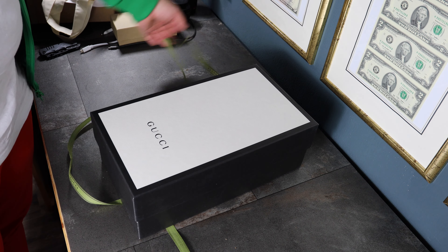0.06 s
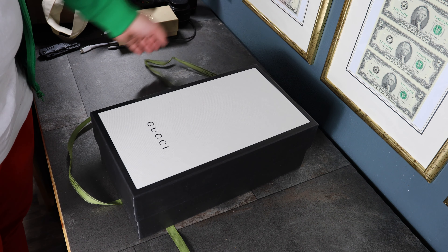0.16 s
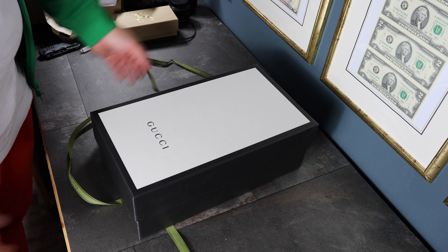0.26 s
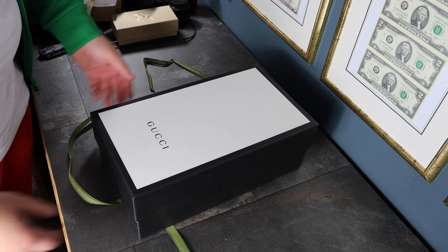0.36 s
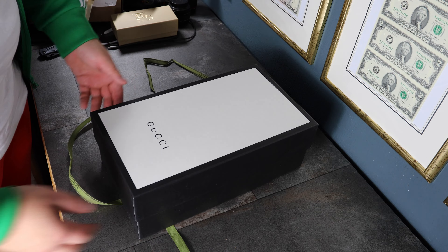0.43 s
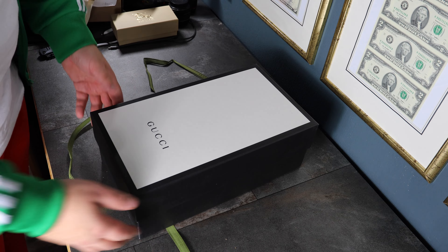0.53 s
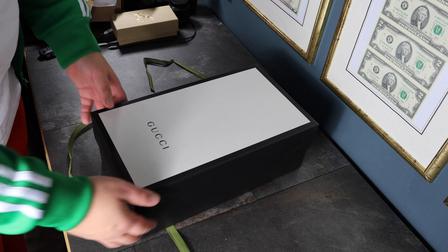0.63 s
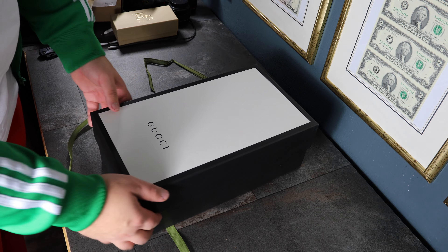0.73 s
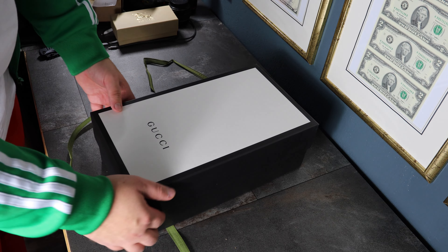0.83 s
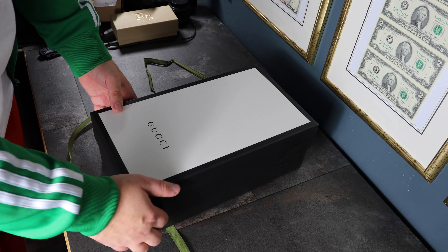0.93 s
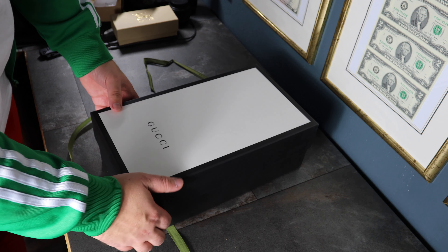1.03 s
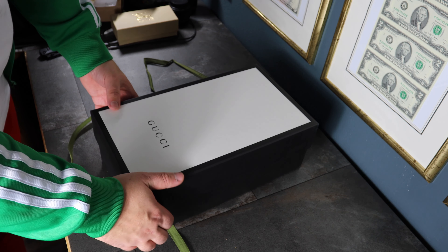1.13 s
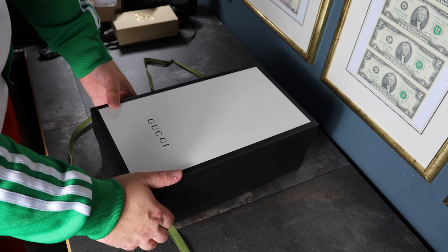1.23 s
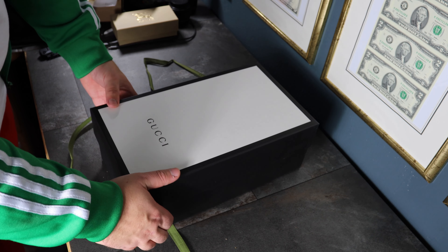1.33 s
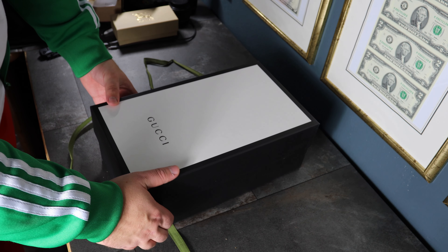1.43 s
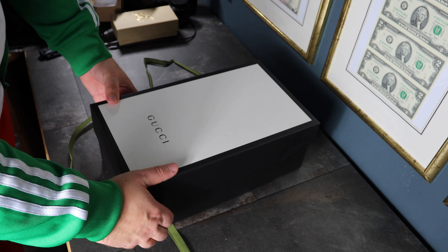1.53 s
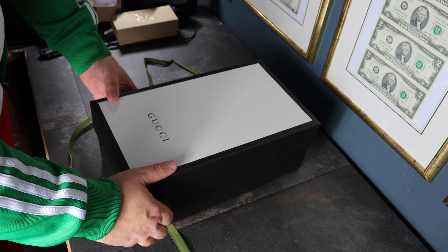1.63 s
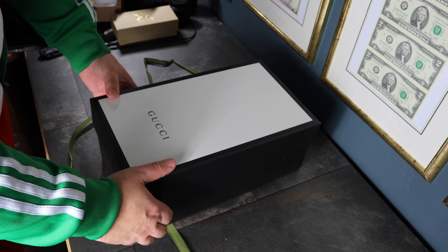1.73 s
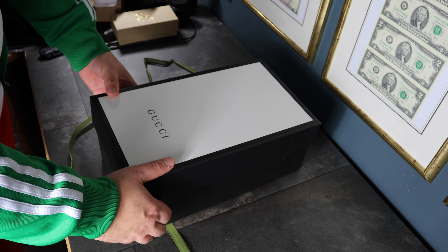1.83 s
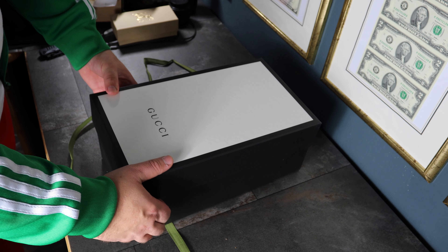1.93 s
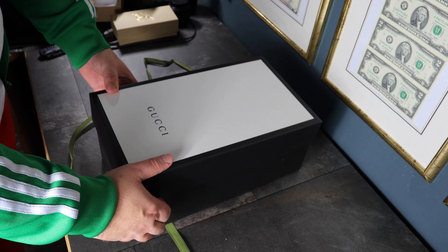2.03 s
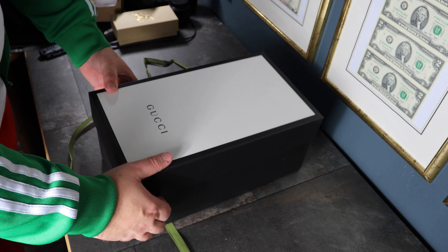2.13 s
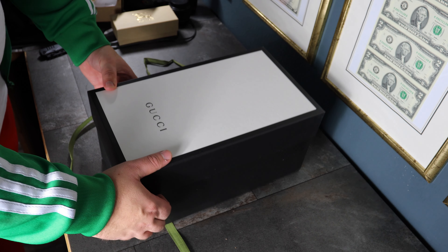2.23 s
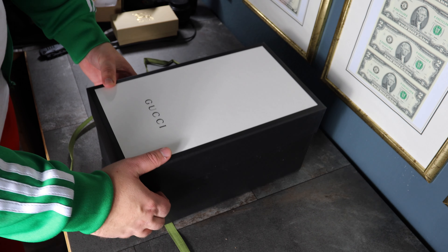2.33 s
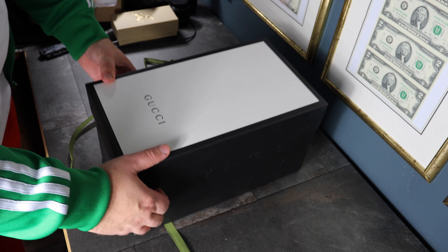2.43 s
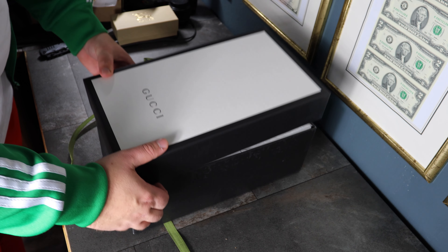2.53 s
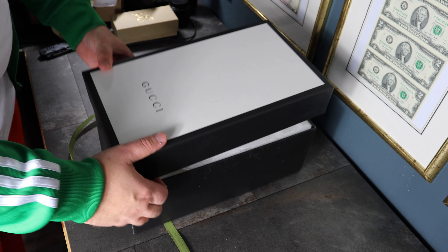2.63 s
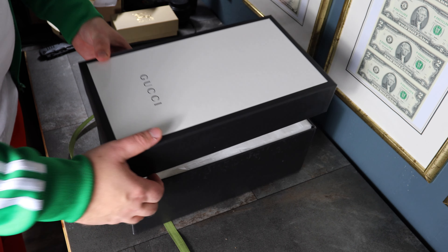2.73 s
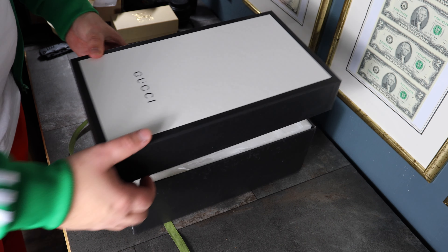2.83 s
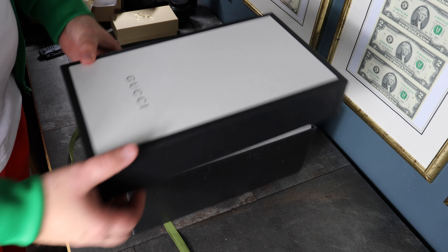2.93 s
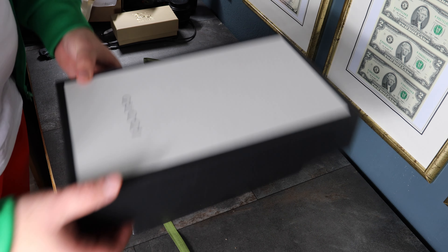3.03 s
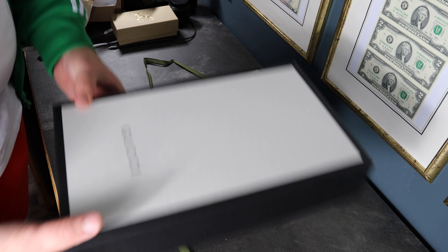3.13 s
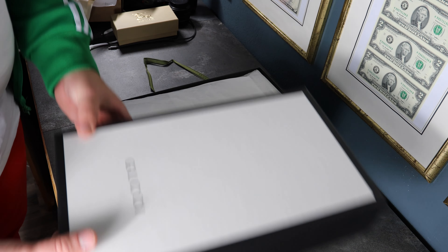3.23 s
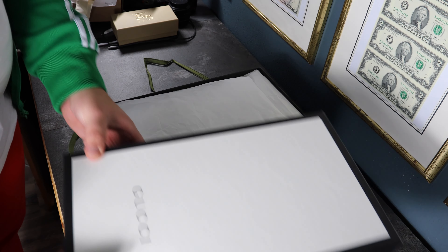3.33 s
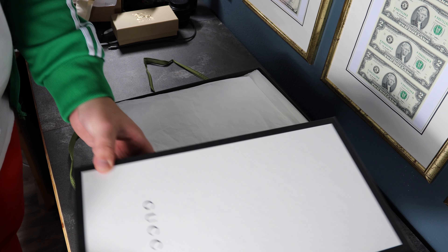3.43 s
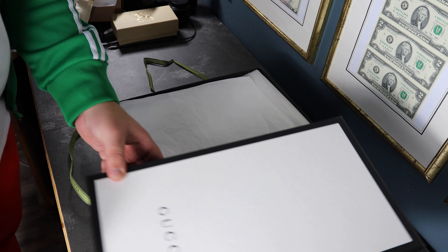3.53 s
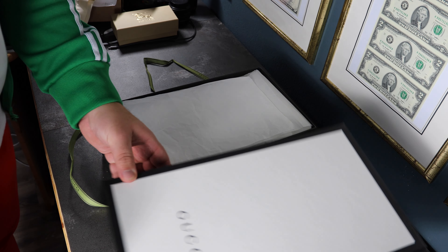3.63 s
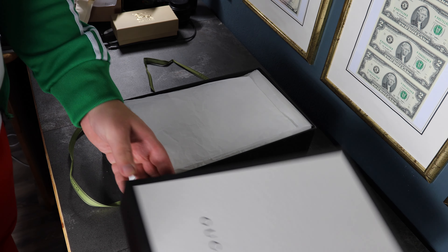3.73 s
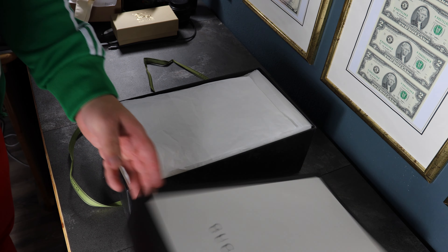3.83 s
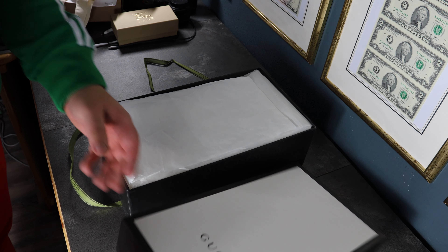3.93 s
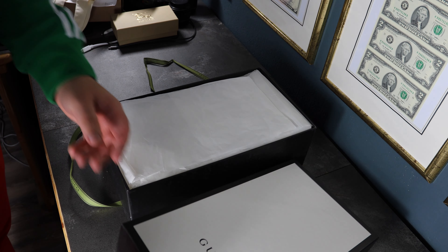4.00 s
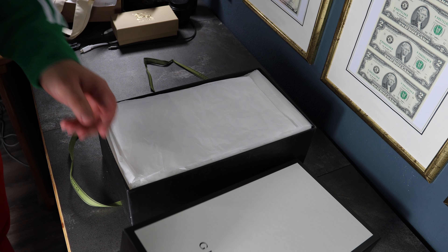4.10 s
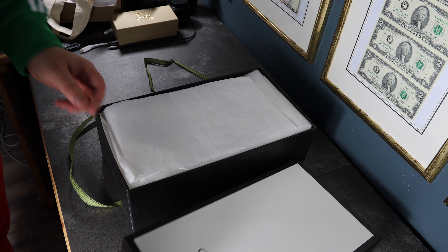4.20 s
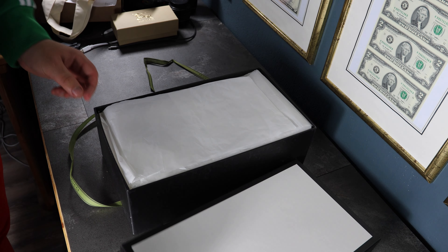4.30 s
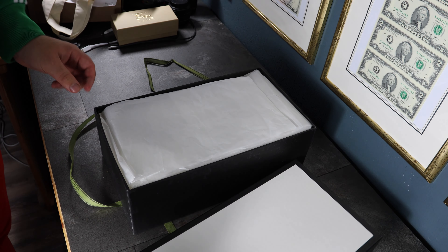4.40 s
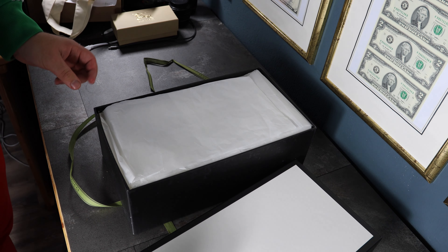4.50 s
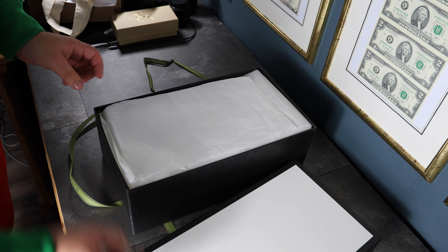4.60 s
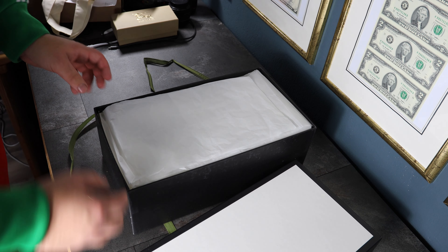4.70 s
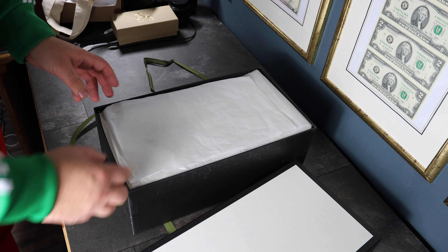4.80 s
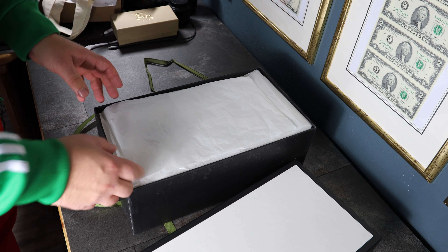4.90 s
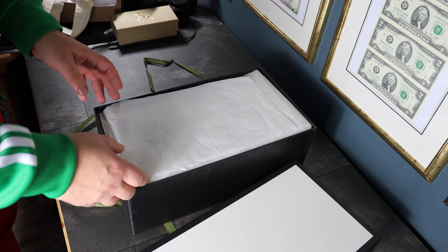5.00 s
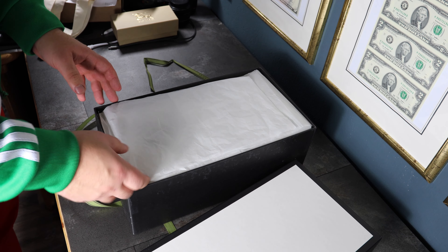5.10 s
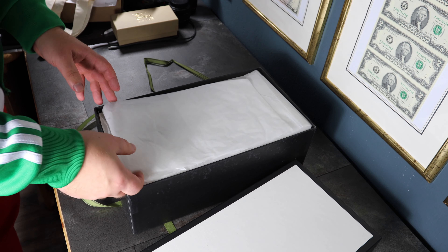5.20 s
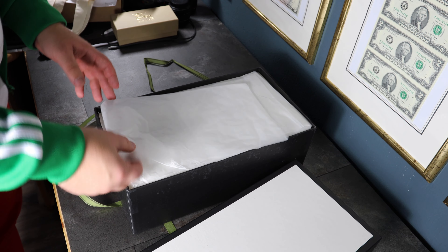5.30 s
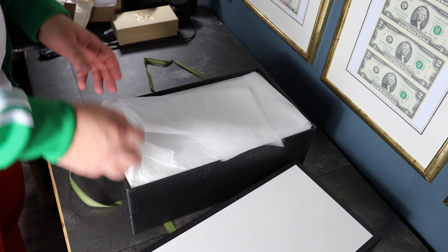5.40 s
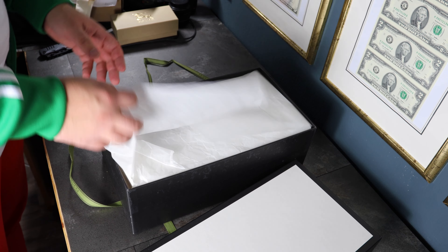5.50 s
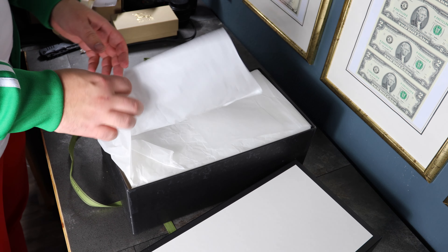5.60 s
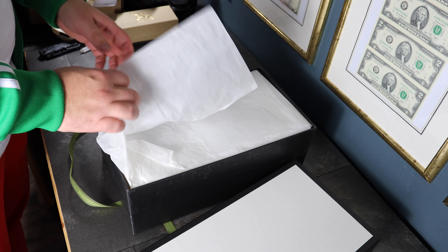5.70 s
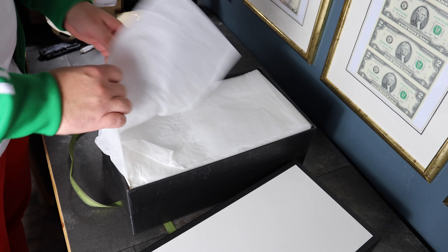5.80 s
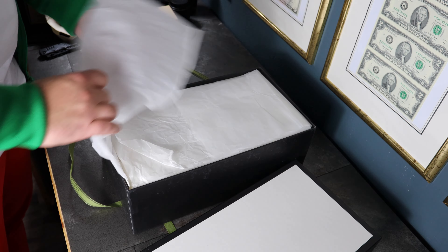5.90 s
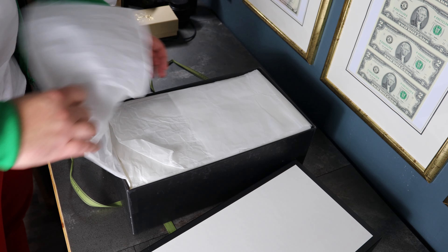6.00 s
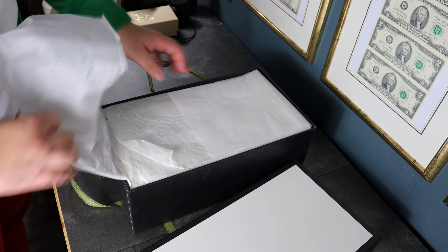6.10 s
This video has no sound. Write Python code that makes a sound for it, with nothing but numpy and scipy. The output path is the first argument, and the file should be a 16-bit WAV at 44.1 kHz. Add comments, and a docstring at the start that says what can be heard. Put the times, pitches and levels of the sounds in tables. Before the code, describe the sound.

Quiet handling of a cardboard box, a soft sliding lid, sharp hollow knocks on a tabletop, then crisp tissue paper rustling and snapping.

```python
"""A cardboard shoebox on a table in a small room, in stereo: fingers tap it, the lid slides off, scuffs and
knocks down on the table, then tissue paper is pinched and folded open. Cardboard rings as damped modes with
noisy cracks and a wall answer; sliding is noise through resonances. Sleeves, until the paper takes over, are
noise in grains and clumps; paper is random crackle plus sharp snaps. A steady room tone lies under it all."""
import sys
import numpy as np
from scipy import signal
from scipy.fft import rfft, irfft, next_fast_len
from scipy.io import wavfile
from scipy.ndimage import uniform_filter1d, map_coordinates

SR = 44100
rng = np.random.default_rng(int(sys.argv[2]) if len(sys.argv) > 2 else 0)


def int16_out(signal):
    """Quantize to a 16-bit WAV file."""
    q = np.round(np.clip(np.atleast_2d(signal).T, -1, 1) * 32767)
    wavfile.write(sys.argv[1], SR, q.astype(np.int16))


N = 271215

# modes of the cardboard lid: pitch_hz, level_db, t60_s (ringing free)
LID_MODES = [(167.3, -9.5, 0.12), (239, -19.5, 0.082), (258, -2, 0.071), (342, 0, 0.082),
             (410.7, -3.5, 0.14), (478.7, -4.5, 0.1), (532, -11, 0.053), (647, 2, 0.053),
             (772, -0.5, 0.049), (823, -1.5, 0.07), (1017, 0.5, 0.087), (1242, -6, 0.068),
             (1362, -15, 0.095), (1612, -9, 0.08), (2000, -19.5, 0.19), (2740, -27.5, 0.036)]
# table and air under the lid: pitch_hz, level_db, t60_s (before damping)
BOOM_MODES = [(122.9, -4.5, 0.34), (203, 4, 0.49), (228, 3.5, 0.36)]
# resonances of the closed box: pitch_hz, width_hz, level_db
BOX_MODES = [(127, 21, -2.5), (184.5, 35, 2.5), (244, 65, -3), (348, 26, -2)]
# lid drops on the table: start_s, level_db, favoured_pitch_hz, focus_db_per_octave, then relative to level_db:
# crack_db, tick_db, boom_db, air_push_db, rest_of_edge_db, panel_hum_db; last far_end_pitch_hz
LID_KNOCKS = [(3.873, 3.5, 513, 16, -13, -12, -31, -28, -8, -30, 374),
              (3.905, 2, 850, -1.5, -12, -18, -23, -28, -10, -22, 450),
              (4.055, 1, 435, 3.5, -14, -20, -33, -32.5, -6.5, -10.5, 410),
              (4.47, 0.5, 307, 14.5, -9.5, -6.5, -17.5, -33, -2, -11.5, 910)]
# rest of the edge, its middle then far end: delay_s, level_db, focus_db_per_octave, free_ringing_share, contact_ms
EDGE_LANDINGS = [(.006, 0, 5.5, .32, 0.88), (.013, -1.5, 18.5, .45, 1.5)]
# panel hum after a knock: delay_s, pitch_hz, focus_db_per_octave, free_ringing_share, build_up_ms
PANEL_HUM = (0.03, 414, 60, 0.71, 5.1)
# fingers and edges touch the held cardboard, and among the knocks (3.831, 3.955, 4.264 s) the lid lightly
# touches the table: # start_s, level_db, favoured_pitch_hz, crack_db (over level_db)
LIGHT_TOUCHES = [(0.004, -33, 503, -5), (0.15, -29.5, 990, -9), (0.169, -34, 463, -3),
                 (0.204, -43, 956, 18.5), (0.688, -43.5, 188, -14), (0.723, -36, 185, -26),
                 (0.77, -45, 150, -16), (0.93, -45, 167, -15), (0.981, -32, 1010, -12), (1.01, -39, 474, -26),
                 (1.026, -31.5, 480, -29), (1.105, -29.5, 447, -2.5), (1.241, -40, 164, -24),
                 (1.261, -29.5, 1510, -17), (1.266, -28, 180, -19), (1.314, -46, 148, -14),
                 (1.366, -33.5, 164, -16), (1.411, -37, 194, -17), (1.444, -51, 300, -12),
                 (1.49, -35, 337, -5), (2.542, -26.5, 335, -16), (2.579, -24.5, 266, -29),
                 (2.749, -29.5, 980, -7), (2.777, -29, 487, -24), (2.82, -31, 990, -14),
                 (2.838, -33.5, 484, -16), (2.884, -34, 980, -4), (2.909, -28.5, 460, -32),
                 (2.932, -28.5, 600, -2.5), (2.947, -31, 524, -19), (3.011, -28.5, 520, -9),
                 (3.136, -39, 160, -14), (3.148, -31, 1080, -15), (3.178, -27, 483, -36),
                 (3.231, -31.5, 1180, -15), (3.269, -38, 250, -20), (3.308, -35, 463, -12),
                 (3.78, -34.5, 550, -26), (3.831, -27.5, 840, -26), (3.955, -21.5, 950, -24),
                 (4.264, -30, 467, -30.5), (5.119, -30.5, 1090, -5.5), (5.146, -28, 480, -12)]
# a middling tap: favoured_pitch_hz, focus_db_per_octave, free_ringing_share, contact_ms
MIDDLING_TAP = [(169, 17, 0.31, 3.5), (468, 15, 0.5, 2.1), (1000, 8.5, 0.52, 1.6)]
# thin bright ticks of edges and threads: start_s, level_db
EDGE_TICKS = [(0.6524, -40.5), (1.128, -42), (1.1822, -34), (1.2331, -32.5), (1.4406, -36.5), (1.6646, -45),
              (2.1645, -37), (4.56, -37.5)]
# lid rubs up the box: time_s, drone_db
LID_SLIDE = [(1.49, -43), (1.556, -60), (1.6, -49.5), (1.93, -51), (2.06, -49), (2.5, -47.5),
             (2.545, -43.5), (2.586, -38), (2.65, -43), (2.706, -52), (2.74, -75)]
# free lid scuffs, one list for each scuff: time_s, level_db
LID_SCUFFS = [
    [(3.235, -43), (3.29, -46.5), (3.35, -50.5), (3.45, -54.5), (3.58, -55)],
    [(3.93, -33), (3.98, -35.5), (4.02, -34.5), (4.037, -30)],
    [(4.2, -69), (4.25, -44), (4.3, -55.5), (4.35, -56.5), (4.41, -43.5), (4.452, -41.5)],
]
# arms move: time_s, swish_db, fine_hiss_db
SLEEVE_MOVES = [(0, -70, -68), (0.1, -51, -54.5), (0.28, -51.5, -55.5), (0.41, -56, -60.5),
                (0.51, -50, -59.5), (0.73, -51.5, -56), (1.05, -49, -63.5), (1.25, -49.5, -52),
                (1.32, -59, -78), (1.5, -52.5, -87), (1.72, -51, -59.5), (1.97, -49, -56), (2.17, -51, -69),
                (2.42, -48.5, -58.5), (2.63, -48.5, -68), (2.71, -58.5, -65), (3.13, -56, -58),
                (3.28, -49, -47), (3.5, -50, -57), (3.71, -47, -48.5), (3.86, -48, -51.5),
                (3.97, -47, -72.5), (4.32, -55, -62), (4.41, -47.5, -50.5), (4.6, -52.5, -62),
                (4.74, -67, -71), (4.95, -55.5, -63)]
# quick brushes of cloth: peak_s, half_length_s, swish_db, fine_hiss_db
CLOTH_BRUSHES = [(0.21, 0.034, -48.5, -62), (1.243, 0.018, -51, -54.5), (1.452, 0.028, -50, -57),
                 (1.679, 0.041, -48, -52.5), (2.171, 0.016, -56, -52), (2.571, 0.044, -41.5, -57),
                 (2.938, 0.04, -43.5, -59.5), (3.03, .06, -50, -57), (4.09, .07, -47, -53.5),
                 (4.245, 0.039, -47, -50)]
# low rumble under the arms: time_s, level_db
RUMBLE_LEVEL = [(0, -79), (1.05, -79), (2.8, -81), (3.2, -73), (3.78, -82), (3.97, -60), (4.03, -57.5),
                (4.17, -76.5), (4.5, -71.5), (4.95, -85.5)]
# colours of cloth swish, fine hiss, low rumble and room tone: pitch_hz, level_db (per Hz)
SWISH_COLOUR = [(150, -49.5), (250, -17.5), (296, -0.5), (345, -11), (419, -7.5), (462, -1), (593, -9),
                (994, -6), (1450, -5.5), (2200, -6), (7000, -23), (9100, -44), (15400, -120)]
HISS_COLOUR = [(1760, -38.5), (3000, -6), (3830, -5), (4160, -7.5), (5890, -9.5), (13700, -12.5),
               (15800, -18)]
RUMBLE_COLOUR = [(15, -37.5), (30, -19), (60, 5), (95, -4), (140, -33.5), (300, -92)]
ROOM_COLOUR = [(15, -62.5), (25, -36), (91, -15), (130, -4), (152, -5.5), (604, -11.5), (729, -10),
               (1390, -17.5), (3130, -17), (3390, -18.5), (9210, -25), (15800, -27.5)]
# colours of the paper sheet, crisp edges and flapping air: pitch_hz, level_db (per Hz)
SHEET_COLOUR = [(410, -25.5), (700, -16.5), (941, -6.5), (1140, -4.5), (1280, -1.5), (1720, -3), (2660, -3),
                (3580, -3.5), (8000, -6.5), (10400, -12.5), (17600, -120)]
CRISP_COLOUR = [(3800, -28), (6500, -12), (9900, 0), (12600, 2), (15000, 0.5), (16000, -3)]
FLAP_COLOUR = [(24, -67), (40, -73), (168, 1), (248, -4), (286, 2), (381, 1), (900, -4.5), (1170, -32),
               (1980, -120)]
# sheet of paper is pulled: time_s, strength_db, broad_folds_db (over strength)
PAPER_PULL = [(4.94, -56, 3), (4.966, -52, 5), (4.99, -32.5, -7.5), (5.01, -35.5, -3.5), (5.056, -39, -6.5),
              (5.064, -44, -5), (5.172, -46, 3.5), (5.178, -37.5, -8.5), (5.226, -31.5, -5),
              (5.334, -33, -6.5), (5.39, -27, -11), (5.41, -29.5, -3.5), (5.442, -22.5, -14),
              (5.492, -19, -7.5), (5.606, -21.5, -6), (5.724, -29.5, -6), (5.956, -24, -7.5),
              (5.98, -30, -6), (6.082, -31.5, -6), (6.138, -23, -6.5), (6.15, -22.5, -4)]
# larger creases let go: start_s, level_db, crisp_db (over level_db)
PAPER_SNAPS = [(4.9537, -40, -16), (4.9901, -24.5, -9), (5.025, -24, 1), (5.0505, -32, 6.5),
               (5.097, -29, -1.5), (5.1379, -29, -4), (5.1802, -27.5, 2), (5.2224, -20, -10),
               (5.2724, -17.5, 0), (5.372, -20.5, -7), (5.382, -17, -4.5), (5.5229, -22, -4),
               (5.5678, -14.5, -13.5), (5.5903, -18, -2), (5.6973, -14.5, 2.2), (5.741, -19, -13),
               (5.7801, -15.5, -2.5), (5.7955, -18, -9), (5.8368, -14, 0.5), (5.888, -20.5, 6.5),
               (5.9112, -13.5, -3.5), (5.95, -19, -8.5), (6.0574, -22, -11.5), (6.1058, -18, -7.5),
               (6.1285, -12.5, 0)]
# left-right likeness of the room and the arms, then of the paper: pitch_hz, likeness (-1 to 1)
ROOM_LIKENESS = [(60, 0.36), (150, 0.99), (380, 0.93), (950, 0.69), (2380, 0.15), (5980, -0.23),
                 (15000, -0.0086)]
PAPER_LIKENESS = [(60, 0.98), (150, 0.99), (380, 0.97), (950, 0.8), (2380, 0.28), (5980, -0.2),
                  (15000, -0.17)]
# how fast the walls' answer dies: pitch_hz, t60_s
WALL_DECAY = [(100, 0.34), (300, 0.26), (1500, .25), (6000, 0.15), (14000, 0.069)]

ROOM_TONE_DB, TOP_HZ = -56.5, 15850  # TOP_HZ: upper band limit
CREST_DB = 8.5  # peak of a puff of noise over its rms
# first corner of a knock: share of free ringing, contact time, delay of its tick
CORNER_FREE, CORNER_MS, TICK_LAG_S = 0.41, 1, 0.0023
# pitch of the middle of the edge; time scale of the push of air; crack of edge and hum
MIDDLE_HZ, PUSH_S, DULL_CRACK_DB = 340, 0.0022, -31
# crack of a middling tap; focus (dB per octave) and share of free ringing added for each dB less crack
TAP_CRACK_DB, SOFT_FOCUS, SOFT_FREE = -15, 0.65, 0.008
# rasp at an easy drone, its dB per dB of drone, its unevenness, level of an easy drone
RASP_DB, RASP_GROWS, JERK_DB, EASY_DB = -60.5, 1.6, 1.5, -50
# draw of air: time and level of its peak, slopes before and after
AIR_S, AIR_DB, AIR_RISE_DB_PER_S, AIR_FALL_DB_PER_S = 2.5, -56.5, 45, 72
FOLD_HZ = 2240  # broad folds sound below, small creases above
RUSTLE_DB, CRISP_DB, BODY_DB, FLAP_DB = -1, -2, -1.5, -7  # paper layers over the strength
CRISP_GROWS, MIDDLING_DB = 0.1, -30  # crispness gained for each dB above a middling pull; that pull


def amp(db):
    """Gain of a level in dB."""
    return 10 ** (np.asarray(db) / 20)


def unit(x):
    """x at rms 1."""
    return x / np.sqrt(np.mean(x ** 2) + 1e-20)


def peak(x):
    """x with its highest peak at 1."""
    return x / np.abs(x).max()


def along(points, hz):
    """Value at hz between (pitch, value) points on a log axis."""
    f, v = np.transpose(points)
    return np.interp(np.log(hz + 1), np.log(f + 1), v)


def curves(rows):
    """One value per sample for each column after the time."""
    s, *columns = np.transpose(rows)
    return [np.interp(np.arange(N) / SR, s, column) for column in columns]


def gate(rows, fade=0.023):
    """1 while the rows last, fading (s) at both ends."""
    t = np.arange(N) / SR
    return np.clip(np.minimum(t - rows[0][0], rows[-1][0] + fade - t) / fade, 0, 1)


def noise(length=N):
    """Two unrelated channels of white noise."""
    return rng.standard_normal((2, length))


def wobble(rate):
    """A smooth random curve, rate knots a second."""
    knots = rng.standard_normal(int(N * rate / SR) + 4)
    return map_coordinates(knots, [np.arange(N) * rate / SR])


def filtered(x, response):
    """x times a complex response of frequency."""
    m = next_fast_len(x.shape[-1] + SR // 8)
    spectrum = rfft(x, m) * response(np.fft.rfftfreq(m, 1 / SR))
    return irfft(spectrum, m)[..., :x.shape[-1]]


def thin(x, hz):
    """Small panels radiate little bass: a high-pass at hz."""
    return signal.sosfilt(signal.butter(2, hz, "high", fs=SR, output="sos"), x)


def shaped(x, colour):
    """x coloured by a spectrum that keeps the power of white noise."""
    hz = np.linspace(0, SR / 2, 2048)
    scale = np.sqrt(np.mean(amp(along(colour, hz)) ** 2))
    return filtered(x, lambda f: amp(along(colour, f)) / scale)


def coloured(pair, gain, alike=ROOM_LIKENESS):
    """Two unrelated signals mixed to a stereo pair of rms 1 with the given left-right likeness."""
    turn = lambda hz: np.arccos(np.clip(along(alike, hz), -1, 1)) / 2
    mid, side = filtered(pair, lambda hz: gain(hz) * [np.cos(turn(hz)), np.sin(turn(hz))])
    return unit(np.array([mid + side, mid - side]))


def rustle(colour, grain_db, clump_db, grain_rate, alike=ROOM_LIKENESS):
    """Stereo noise whose strength varies in short grains and slower clumps."""
    lumps = amp(grain_db * wobble(grain_rate) + clump_db * wobble(45))
    return coloured(lumps * noise(), lambda hz: amp(along(colour, hz)), alike)


def modes(peaks):
    """The response of a few (pitch_hz, width_hz, level_db) resonances, alternating in sign."""
    def response(f):
        total = 0
        for k, (centre, width, db) in enumerate(peaks):
            loss = 1j * f * width
            total = total + (-1) ** k * amp(db) * loss / (centre ** 2 - f ** 2 + loss)
        return total
    return response


def ringing(table, t, tilt_db, stretch, rough, wide_db):
    """Damped modes at new strengths and sides, phases drifting at random for a rougher ring; stereo."""
    hz, level, t60 = (c[:, None] for c in np.transpose(table))
    drift = rough * np.cumsum(rng.standard_normal((len(hz), len(t))), axis=1) * np.sqrt(hz / SR)
    drift = uniform_filter1d(drift, size=48, axis=1)  # smoothed over about 1 ms to keep the treble clean
    start_db = level + tilt_db(hz) + rng.normal(0, 0.9, hz.shape)
    size = amp(start_db - 60 * t / (t60 * stretch))
    # the higher modes lean further to a side
    lean = wide_db * rng.standard_normal(len(hz)) * np.clip(hz[:, 0] / 1000, 0, 1) ** 2
    signs = rng.choice([-1, 1], len(hz))
    return (signs * amp([lean, -lean])) @ (size * np.sin(2 * np.pi * hz * t + drift))


def room(x):
    """The walls answer 200 samples (about 1.5 m of path) later; each pitch dies at its own speed."""
    hz, t, z = signal.stft(noise(SR // 4), SR, nperseg=256)
    decay = amp(-60 * t / along(WALL_DECAY, hz)[:, None])
    tail = signal.istft(z * decay, SR, nperseg=256)[1]
    tail = coloured(tail, np.ones_like)
    return signal.fftconvolve(np.pad(x, (200, 0))[None], tail / np.linalg.norm(tail[0]), axes=1)


def strikes(rows, wet_db, crack_t60, size):
    """Every blow rings the lid's modes, most those near its favoured pitch, cracks briefly and fills the room."""
    out, t = np.zeros((2, N + 2 * SR)), np.arange(size) / SR
    for s, db, pitch_hz, focus_db, crack_db, free, contact_ms, *boom_db in rows:
        near = lambda hz: -focus_db * np.abs(np.log2(hz / pitch_hz))
        ring = ringing(LID_MODES, t, near, free, rough=0.25, wide_db=6.0)
        build_up = 1 - np.exp(-(t / (contact_ms / 1000)) ** 2)
        ring = thin(peak(ring * build_up), hz=144)
        crack = amp(-60 * t / crack_t60) * noise(len(t))
        crack = filtered(crack, lambda f: modes([(3100, 3600, 0)])(f) ** 3)
        dry = amp(db) * (ring + amp(crack_db) * crack)
        if boom_db:  # builds up after the blow
            boom = peak(ringing(BOOM_MODES, t, np.zeros_like, 0.82, rough=0.19, wide_db=1.5))
            dry += amp(db + boom_db[0]) * boom * (1 - np.exp(-(t / 0.028) ** 2))
        wet = amp(wet_db) * room(dry[0])
        at = round(s * SR)
        out[:, at:at + len(t)] += dry
        out[:, at:at + wet.shape[1]] += wet
    return out[:, :N]


def bursts(rows, t60, pan_db, scatter_db):
    """Short puffs of noise at (start_s, level_db), placed left (positive) or right with some scatter."""
    out, t = np.zeros((2, N + SR)), np.arange(SR // 10) / SR
    front = (1 - np.exp(-t / 0.0003)) * (1 + 0.6 * np.exp(-t / 0.0025))  # sharp
    for s, db in rows:
        side_db = (pan_db + scatter_db * rng.standard_normal()) / 2
        puff = amp(db - CREST_DB - 60 * t / t60) * front * noise(len(t))
        out[:, round(s * SR):][:, :len(t)] += puff * amp([[side_db], [-side_db]])
    return out[:, :N]


def room_tone():
    """The steady tone of the room: wide, uneven coloured noise."""
    return amp(ROOM_TONE_DB) * rustle(ROOM_COLOUR, grain_db=1.2, clump_db=2.9, grain_rate=200)


def sleeves():
    """Cloth swishes with the arms, a narrow whisper and fine hiss on top, rumble below; a little to the right."""
    t = np.arange(N) / SR
    power = amp(curves(SLEEVE_MOVES)) ** 2
    for s, half, *db in CLOTH_BRUSHES:
        stroke = np.clip(1 - np.abs(t - s) / half, 0, 1)
        power += amp(db)[:, None] ** 2 * stroke ** 2
    swish_gain, hiss_gain = np.sqrt(power)
    whisper = coloured(noise(), lambda f: modes([(2220, 420, 0)])(f) ** 2)
    whisper *= amp(-10.5 + 4 * wobble(5))
    swish = swish_gain * (rustle(SWISH_COLOUR, grain_db=0.15, clump_db=1.74, grain_rate=430) + whisper)
    hiss = hiss_gain * rustle(HISS_COLOUR, grain_db=1.0, clump_db=1.8, grain_rate=640)
    rumble = amp(curves(RUMBLE_LEVEL)[0]) * rustle(RUMBLE_COLOUR, grain_db=0.5, clump_db=0.5, grain_rate=8)
    return gate(SLEEVE_MOVES) * (swish + hiss + rumble) * amp([[-0.8], [0.8]])


def tapping():
    """Softer touches crack less, ring fewer modes and ring longer."""
    s, db, hz, crack_db = np.transpose(LIGHT_TOUCHES)
    known_hz, focus_db, free, contact_ms = np.transpose(MIDDLING_TAP)
    at_pitch = lambda v: np.interp(np.log(hz), np.log(known_hz), v)
    soft_db = TAP_CRACK_DB - crack_db
    focus_db = np.maximum(at_pitch(focus_db) + SOFT_FOCUS * soft_db, 2)
    free = at_pitch(free) + SOFT_FREE * soft_db
    rows = zip(s, db, hz, focus_db, crack_db, free, at_pitch(contact_ms))
    return strikes(rows, wet_db=-10, crack_t60=0.022, size=SR // 8)


def edge_ticks():
    """Edges and threads tick: very short bright puffs of noise."""
    return shaped(bursts(EDGE_TICKS, t60=0.007, pan_db=1.5, scatter_db=4.5), CRISP_COLOUR)


def lid_sliding():
    """Stick-slip rubbing excites the closed box; air is drawn in as the seal opens."""
    drone_db, = curves(LID_SLIDE)
    rasp_db = RASP_DB + RASP_GROWS * (drone_db - EASY_DB) + JERK_DB * wobble(18)
    late = np.arange(N) / SR - AIR_S
    air_db = AIR_DB + np.minimum(AIR_RISE_DB_PER_S * late, -AIR_FALL_DB_PER_S * late)
    slips = amp(1.5 * wobble(30)) * noise()
    drone = thin(coloured(slips, modes(BOX_MODES)), hz=96)
    rasp = thin(coloured(slips, modes([(580, 160, 1.0), (674, 87, -4.5)])), hz=300)
    air = coloured(noise(), lambda f: modes([(62, 45, 0)])(f) ** 2)
    return gate(LID_SLIDE) * (amp(drone_db) * drone + amp(rasp_db) * rasp) + amp(air_db) * air


def lid_scuffing():
    """Light friction rings the free lid's modes as broad bands."""
    bands = [(hz, 8 / t60, db + 2.1 * np.log2(hz / 400)) for hz, db, t60 in LID_MODES]
    scuff = thin(coloured(amp(wobble(65)) * noise(), modes(bands)), hz=200)
    return scuff * sum(gate(rows) * amp(curves(rows)[0]) for rows in LID_SCUFFS)


def lid_knocking():
    """A corner lands and squeezes out air, the rest of the edge follows, all boom, then the panel hums."""
    blows, hums, ticks, push = [], [], [], np.zeros(N)
    u = np.arange(SR // 10) / SR / PUSH_S
    puff = np.e * u * (2 - u) * np.exp(-u)  # one swing up, then below zero
    hum_lag, hum_hz, hum_focus, hum_free, hum_ms = PANEL_HUM
    for s, db, pitch_hz, focus_db, crack_db, tick_db, boom_db, push_db, edge_db, hum_db, far_hz in LID_KNOCKS:
        blows.append((s, db, pitch_hz, focus_db, crack_db, CORNER_FREE, CORNER_MS, boom_db))
        for hz, (lag, rel, focus, free, ms) in zip((MIDDLE_HZ, far_hz), EDGE_LANDINGS):
            blows.append((s + lag, db + edge_db + rel, hz, focus, DULL_CRACK_DB, free, ms, boom_db - edge_db))
        hums.append((s + hum_lag, db + hum_db, hum_hz, hum_focus, DULL_CRACK_DB, hum_free, hum_ms))
        ticks.append((s + TICK_LAG_S, db + tick_db))
        push[round(s * SR):][:len(u)] += amp(db + push_db) * puff
    knocks = strikes(blows, wet_db=-10.5, crack_t60=0.033, size=SR // 3)
    knocks += strikes(hums, wet_db=-14, crack_t60=0.022, size=SR // 6)
    knocks += thin(push, hz=55)
    knocks += shaped(bursts(ticks, t60=0.0023, pan_db=-1, scatter_db=0.5), CRISP_COLOUR)
    knocks[0] = np.roll(knocks[0], 3)  # the lid lies to the right: the left microphone hears it later
    return knocks


def crackle(rate, spread_db, t60, bed):
    """Strength of a crumpling sheet: sudden small releases that die away, over a steady bed."""
    kicks = (rng.random(N) < rate / SR) * amp(spread_db * rng.random(N)) ** 2
    power = signal.lfilter([1], [1, -amp(-120 / (t60 * SR))], kicks)
    return unit(np.sqrt(bed + power / power.mean()))


def patchy(depth_db):
    """Stereo noise whose level varies a little at random in small patches of time and pitch."""
    z = signal.stft(noise(), nperseg=128)[2]
    field = rng.standard_normal(z.shape[1:])
    for axis in (0, 1):
        field = uniform_filter1d(field, size=5, axis=axis)
    return signal.istft(z * amp(depth_db * unit(field)), nperseg=128)[1][:, :N]


def paper_snaps():
    """Larger creases let go: a puff of sheet noise and a shorter crisp one."""
    broad = [(s, db) for s, db, _ in PAPER_SNAPS]
    crisp = [(s, db + rel) for s, db, rel in PAPER_SNAPS]
    snaps = shaped(bursts(broad, t60=0.08, pan_db=-4, scatter_db=1.5), SHEET_COLOUR)
    return snaps + shaped(bursts(crisp, t60=0.054, pan_db=4.0, scatter_db=5), CRISP_COLOUR)


def tissue():
    """Countless tiny creases crackle; larger ones snap; the sheet flaps air."""
    pull_db, folds_db = curves(PAPER_PULL)
    layer = lambda strength, gain: coloured(strength * patchy(depth_db=1.0), gain, PAPER_LIKENESS)
    sheet_gain = lambda hz: amp(along(SHEET_COLOUR, hz))
    above = lambda hz: 1 / np.sqrt(1 + (FOLD_HZ / (hz + 1)) ** 6)
    creases = crackle(rate=300, spread_db=5.5, t60=0.029, bed=1.0)
    folds = crackle(rate=110, spread_db=16, t60=0.05, bed=0.72)
    body = layer(folds, lambda hz: sheet_gain(hz) * np.sqrt(1 - above(hz) ** 2))
    sheet = layer(creases, lambda hz: sheet_gain(hz) * above(hz))
    crisp = layer(creases * amp(0.77 * wobble(600)), lambda hz: amp(along(CRISP_COLOUR, hz)))
    flap = rustle(FLAP_COLOUR, grain_db=1, clump_db=1.45, grain_rate=90, alike=PAPER_LIKENESS)
    crisp_db = CRISP_DB + CRISP_GROWS * (pull_db - MIDDLING_DB)
    small = amp(RUSTLE_DB) * sheet + amp(crisp_db) * crisp
    broad = amp(folds_db) * (amp(BODY_DB) * body + amp(FLAP_DB) * flap)
    return gate(PAPER_PULL) * amp(pull_db) * (small + broad) + paper_snaps()


def scene():
    """All sources over the room's steady tone, the hands on the box a little to the right."""
    hands = (tapping() + lid_sliding()) * amp([[-0.7], [0.7]])
    cardboard = hands + edge_ticks() + lid_scuffing() + lid_knocking()
    return room_tone() + sleeves() + cardboard + tissue()


def record(dry):
    """Soft limiting brings the loudest knocks close to full scale; nothing passes above the band limit."""
    limited = dry / (1 + np.abs(dry) ** 8) ** (1 / 8)
    return filtered(limited, lambda hz: hz < TOP_HZ)


dry = scene()
out = record(dry)
int16_out(out)
```